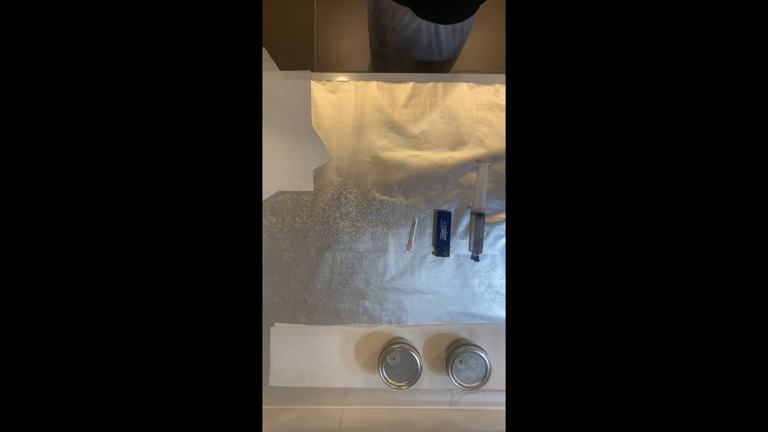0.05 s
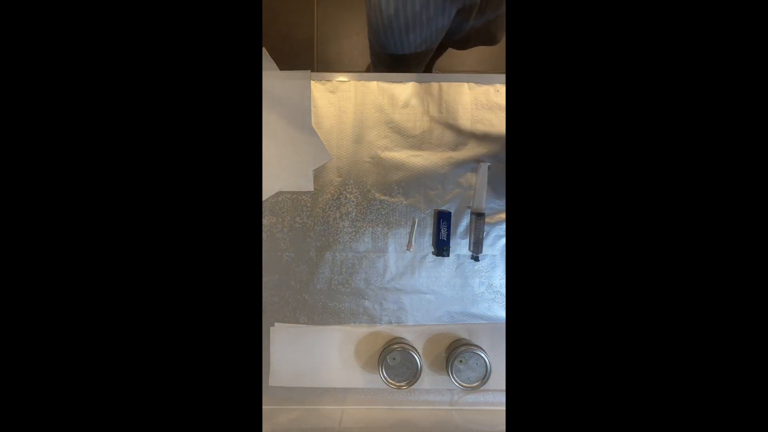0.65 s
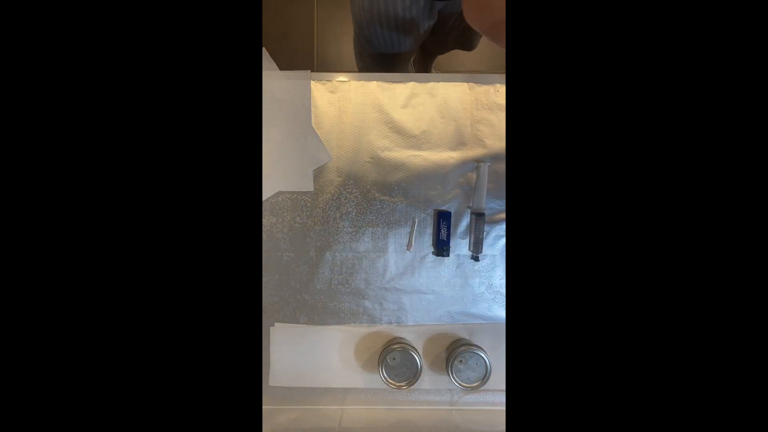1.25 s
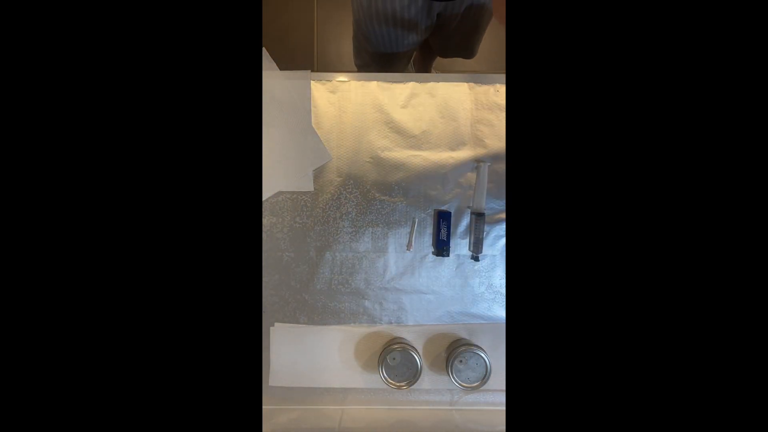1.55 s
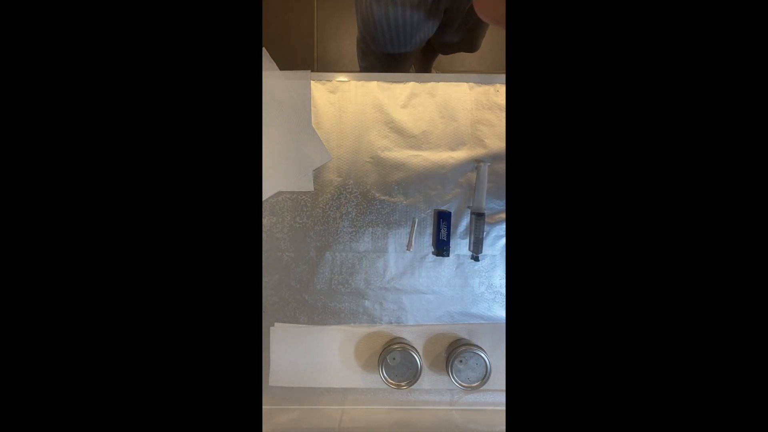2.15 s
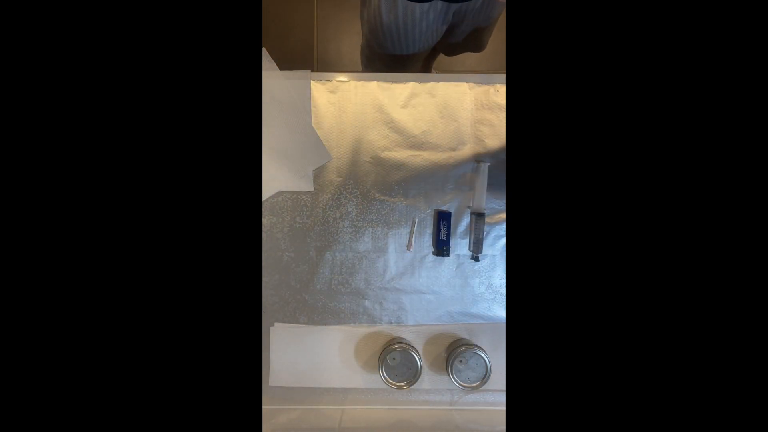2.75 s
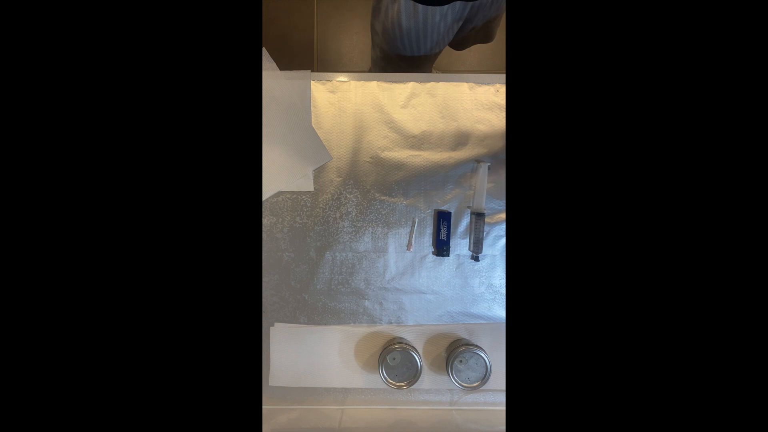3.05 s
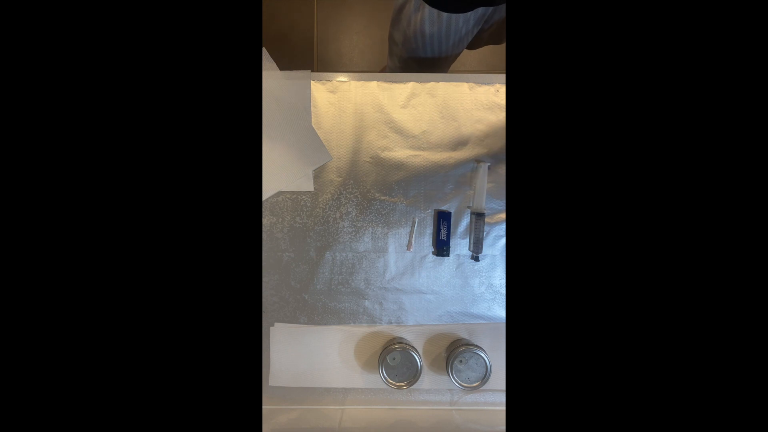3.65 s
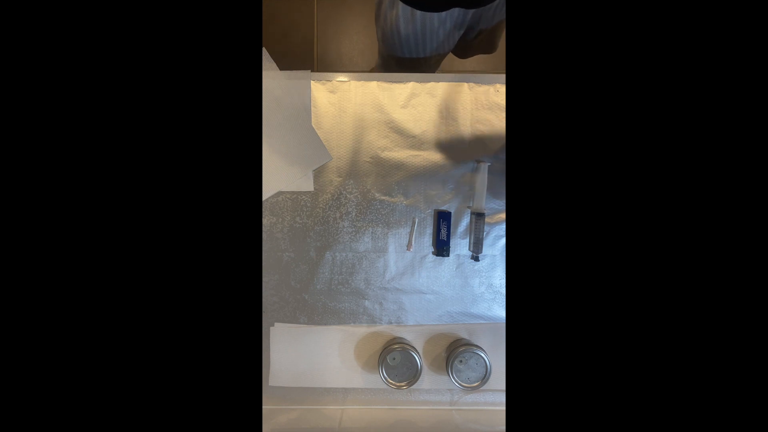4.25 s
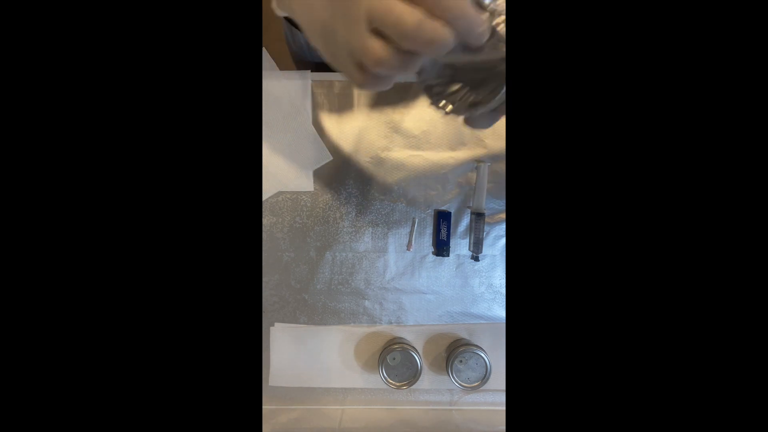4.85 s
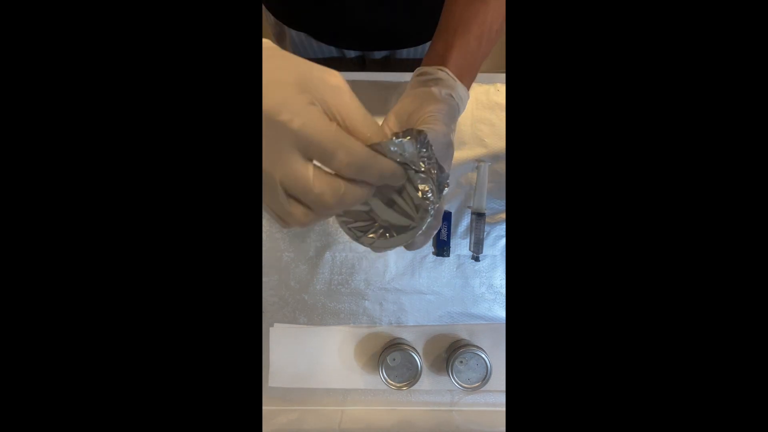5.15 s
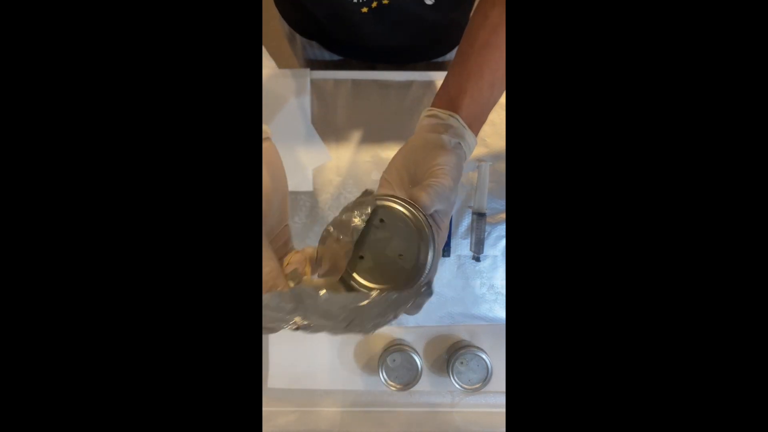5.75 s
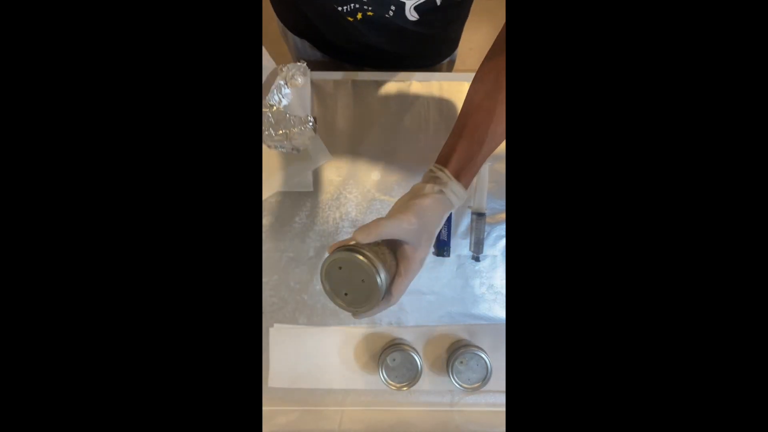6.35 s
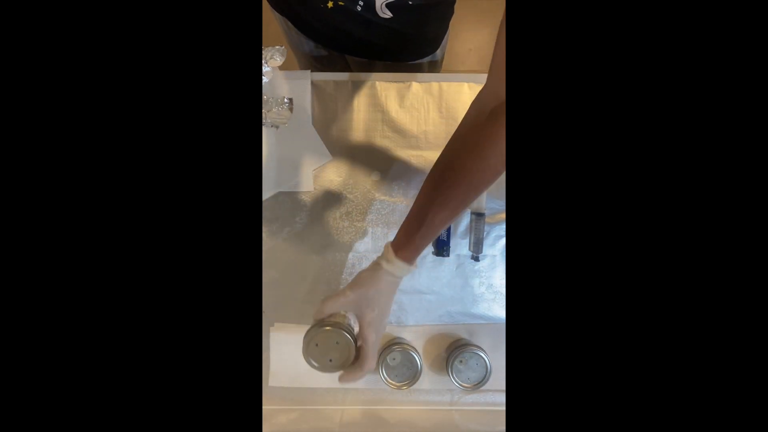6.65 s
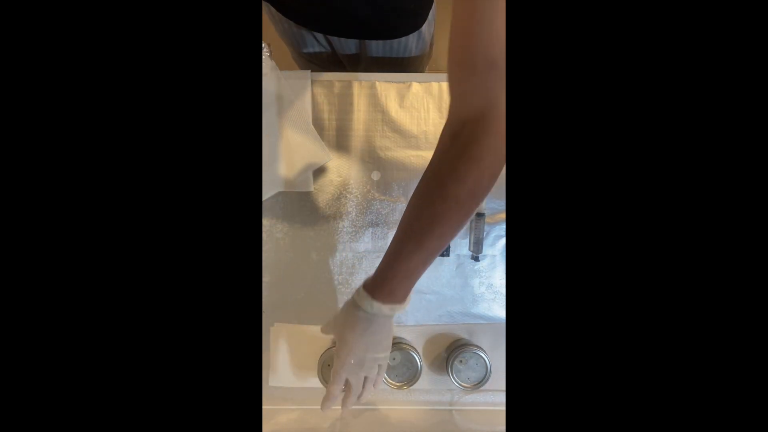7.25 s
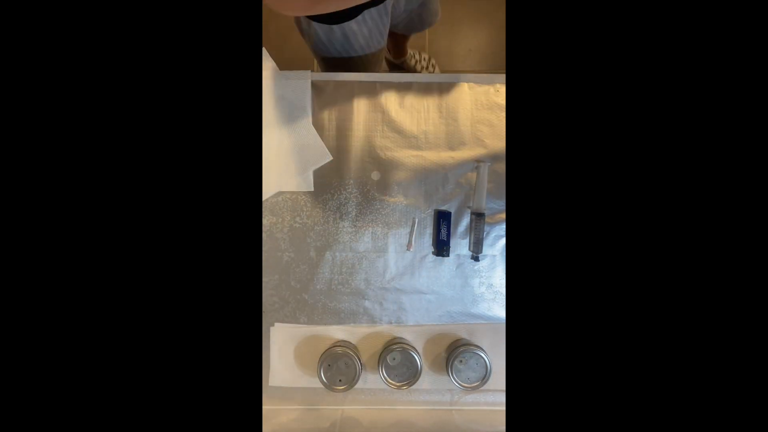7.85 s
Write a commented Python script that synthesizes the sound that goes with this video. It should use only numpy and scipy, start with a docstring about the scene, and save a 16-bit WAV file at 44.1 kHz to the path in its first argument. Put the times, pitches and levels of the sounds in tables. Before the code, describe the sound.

Close foil rustling builds to bright crackling in a small room; a jar knocks early on and is later set down softly.

```python
"""Aluminium foil crackles as it is picked loose and peeled off the metal lid of a glass jar, close by.
Creases snap singly and in avalanches, ringing facets of the sheet; large patches flip with a hollow pop.
Early on, further off, metal clinks and a jar knocks on a hard top. The bare jar is set down on a padded
table and the foil is gathered up. A small room adds echoes and a low ventilation rumble."""
import sys
import numpy as np
from scipy import signal
from scipy.fft import rfft, irfft, next_fast_len
from scipy.io import wavfile

SR = 44100
rng = np.random.default_rng(int(sys.argv[2]) if len(sys.argv) > 2 else 0)


def wrap_up_sound(samples):
    """Save the sound to the file named by the first command line argument, as 16-bit audio."""
    columns = np.atleast_2d(samples).T
    # keep every value between -1 and 1, then stretch to whole-number steps
    tamed = np.clip(columns, -1, 1)
    steps = np.round(tamed * 32767).astype(np.int16)
    wavfile.write(sys.argv[1], SR, steps)


N = 352491
T = np.arange(N) / SR

# Table levels are relative; each source sets its own gain.
# avalanches of creases (time [s], level [dB])
FOIL_CRUMPLES = [(0.0705, -27), (0.1587, -38.5), (0.2713, -40.5), (0.6755, -53.5), (0.6988, -40.5),
                 (0.934, -41.5), (0.9583, -31), (0.9794, -39), (1.6813, -36), (2.1636, -56),
                 (2.3548, -33.5), (2.3771, -31.5), (2.53, -23), (2.5626, -25.5), (2.616, -27.5),
                 (2.675, -31), (2.7056, -30), (2.744, -29.5), (2.7726, -36), (2.859, -36), (2.939, -34),
                 (3.0472, -30), (3.065, -32.5), (3.1015, -33), (3.211, -31), (3.266, -35.5),
                 (3.5294, -36.5), (3.553, -39), (3.669, -31.5), (3.79, -29.5), (3.8294, -24), (3.893, -17),
                 (4.0736, -49), (4.1928, -31), (4.2517, -46.5), (4.343, -29), (4.3644, -33),
                 (4.3793, -29.5), (4.4734, -20.5), (4.6165, -21.5), (4.6412, -14.5), (4.6773, -12.5),
                 (4.7284, -18), (4.806, -15.5), (4.8267, -18.5), (4.8404, -17), (4.995, -14),
                 (5.057, -21.5), (5.1966, -25), (5.242, -8.5), (5.2524, -12), (5.2624, -8.5),
                 (5.2674, -11.5), (5.3234, -25.5), (5.3787, -31.5), (5.4814, -19.5), (5.5, -19.5),
                 (5.5383, -21), (5.5608, -24), (5.5887, -17), (5.6655, -24.5), (5.686, -20.5), (5.7218, -9),
                 (5.7355, -11), (5.754, -14.5), (5.8, -24.5), (7.6056, -33.5), (7.6254, -21),
                 (7.6869, -21.5), (7.7783, -16), (7.8634, -20.5)]
# single creases (time [s], level [dB])
LONE_SNAPS = [(1.2124, -34), (1.3724, -42), (1.5693, -43), (1.6581, -33), (1.7958, -34), (1.9145, -35),
              (2.3575, -29), (2.4563, -31), (2.6475, -27), (2.706, -23), (2.828, -29), (2.9925, -32),
              (3.2091, -31), (3.4266, -35), (3.6037, -31), (3.767, -22), (4.2842, -32), (4.4370, -21),
              (4.6631, -17), (4.71, -16), (4.7285, -14), (4.8327, -15), (4.9691, -23), (5.024, -13),
              (5.1012, -12), (5.1297, -15), (5.2704, -8), (5.407, -17), (5.4707, -20), (5.4827, -10),
              (7.524, -47), (7.9463, -25)]
# large patches flipping (time [s], pitch [Hz], peak [dB])
PATCH_POPS = [(2.707, 1100, -42), (4.733, 650, -32), (5.058, 750, -32), (5.539, 1000, -32),
              (5.764, 600, -30), (6.61, 4300, -49)]
# finger moves on the foil (start [s], length [s], level [dB], hollow body re level [dB])
FINGER_MOVES = [(-.1, 0.46, -54.5, -5), (0.918, 0.68, -61, -5), (2.122, 0.23, -71.5, -12.5),
                (2.511, .21, -43.5, -11.5), (2.675, 0.71, -43.5, -19.5), (3.665, 0.42, -37, -20.5),
                (4.213, 0.36, -41, -22.5), (4.559, 0.19, -29.5, -20), (4.793, 0.044, -35.5, -7.5),
                (4.938, 0.54, -34, -16), (5.421, 0.19, -32, -10), (5.69, 0.101, -41, 5),
                (6.518, 0.16, -75, -6), (7.132, 0.6, -80, -3), (7.552, 0.11, -57, 4),
                (7.635, 0.14, -40, 1.5), (7.783, 0.17, -35, -13.5)]
# fine crease spectrum (frequency [Hz], level [dB])
CREASE_SPECTRUM = [(100, -27), (500, -23), (1200, -20), (2600, -13.5), (4300, -2.5), (6000, -.5), (8500, 0),
                   (12500, -4), (14000, -7.5), (16000, -11)]
# lone snap spectrum (frequency [Hz], level [dB])
TICK_SPECTRUM = [(300, -26), (2500, -24), (4500, -12), (7000, -3), (12500, 0), (16000, -4)]
# flexing sheet spectrum (frequency [Hz], level [dB])
SHEET_SPECTRUM = [(50, -7), (150, -3.5), (400, -8), (850, -7.5), (1100, -5.5), (1550, -0.5), (2150, 2),
                  (2900, 3), (4200, 5.5), (8000, -2)]
# jar chattering on a hard top (time [s], level [dB])
KNOCK_CONTACTS = [(0.964, -27.5), (1.03, 1), (1.0378, -5.5), (1.047, -12.5), (1.052, -3), (1.058, -7)]
# modes of jar and top (frequency [Hz], level [dB], t60 [s])
JAR_TOP_MODES = [(108, -23.5, .5), (155.6, -20, 0.43), (186.4, -19, 0.5), (216.5, -21, 0.69),
                 (330, -16.5, .2), (471.8, -14, 0.19), (600, -15.5, .1), (780, -14.5, 0.085),
                 (867, -13.5, .12), (1112, -15, .15), (1286, -14.5, .15), (1480, -4.5, .07),
                 (1470, -4, 0.2), (1744, -15, .15), (1990, -8.5, 0.13), (2100, -2, .13), (2037, 0.5, .07)]
# contact crack spectrum (frequency [Hz], level [dB])
CRACK_SPECTRUM = [(60, -9.5), (200, 0.5), (520, 0.5), (800, 1.5), (1050, -2), (1470, 6.5), (1750, -0.5),
                  (2100, 6.5), (2700, -6), (3300, -6.5), (4000, -13.5), (4850, -6), (6200, -11.5),
                  (12000, -33.5), (16000, -41.5)]
# blows on the padded table (time [s], level [dB])
TABLE_THUDS = [(7.099, 9), (7.109, 5.5), (7.648, -10), (7.668, -2), (7.897, -5.5)]
# table modes (frequency [Hz], level [dB], t60 [s])
PADDED_TABLE_MODES = [(78, -3.5, 0.27), (110.6, -4, 0.2), (133, 4.5, 0.093), (218.4, 0, 0.17),
                      (252, -1, 0.058)]
# light touches of jar and fingers (time [s], level [dB])
JAR_TOUCHES = [(.565, -2.5), (.725, 2.5), (6.748, 11), (6.805, -4), (7.307, 2.5), (7.42, -4.5)]
# held jar modes (frequency [Hz], level [dB], t60 [s])
HELD_JAR_MODES = [(820, 1, .09), (1276, -10, .07), (2105, -5, .07), (2186, -6, .07), (3106, -7, .04),
                  (3989, -7, .04)]
# bumps on something hollow (time [s], level [dB])
HOLLOW_BUMPS = [(7.738, -27.5), (7.757, -31), (7.781, -29.5)]
# its modes (frequency [Hz], level [dB], t60 [s])
BUMP_MODES = [(1938, -4, .07), (2099, -1, .08)]
# room reverberation (frequency [Hz], t60 [s])
REVERB_T60 = [(100, 1), (280, .55), (600, .75), (1500, .72), (4000, .58), (8000, .45), (15000, .3)]
# ventilation spectrum (frequency [Hz], level [dB])
RUMBLE_SPECTRUM = [(45, -3), (70, 2.5), (115, -1), (160, -4), (210, -27), (300, -12), (420, -20.5),
                   (800, -24.5), (1600, -38.5), (5000, -36), (16000, -56)]
# left-right likeness of room echo and rumble (frequency [Hz], correlation [0..1])
STEREO_LIKENESS = [(100, 1), (600, .14), (6000, .1), (9500, .9), (13000, .3)]
# pad, jar scuff and metal scrape spectra (frequency [Hz], level [dB])
PAD_SPECTRUM = [(50, -17), (120, 0.5), (250, 1.5), (450, -23.5), (1200, -25)]
SCUFF_SPECTRUM = [(300, -8.5), (800, -6.5), (1300, -3.5), (2150, -4.5), (4000, -4.5), (9000, -19)]
SCRAPE_SPECTRUM = [(1500, -17.5), (2700, -6), (3080, -5.5), (3400, 1), (3720, -5), (4300, -10),
                   (8000, -30)]

CRUMPLE_RISE_S, CRUMPLE_DECAY_S, DECAY_DOUBLING_DB = 0.0018, 0.0047, 36  # softer crumples last longer
GRIP_S, EASE_DB_PER_S, LET_GO_DB_PER_S = 0.047, 9.5, 243
SETTLE_DB, SETTLE_DB_PER_S = -17.5, 74.5
POP_Q, POP_DECAY_S = 5, 0.0097
RIGHT_LAG_S, BASS_CUT_HZ, TOP_CUT_HZ = 5.0e-5, 55, 15900


def crumples():
    """One crease sets off its neighbours in a fading avalanche; hard ones shake the whole sheet."""
    push, t = np.zeros(N), T[:SR // 8]
    for time_s, db in FOIL_CRUMPLES:
        start = int(time_s * SR)
        decay_s = CRUMPLE_DECAY_S * 2 ** (-db / DECAY_DOUBLING_DB)
        rise = 1 - np.exp(-t / CRUMPLE_RISE_S)
        push[start:start + len(t)] += undb(db + 2) * np.exp(-t / decay_s) * rise
    avalanche = scatter(creases(rate_hz=13000, spread_db=6) * push, decay_s=0.00063, tail_db=-6)
    flex = avalanche * push ** 0.58
    return undb(-8.5) * colour(avalanche, CREASE_SPECTRUM) + undb(0.5) * colour(flex, SHEET_SPECTRUM)


def rustle():
    """Moving foil fizzes with tiny creases; small facets ping, large patches ring hollow."""
    level, body = handling()
    fizz_snaps = crackles(rate_hz=2800, spread_db=5, spurt_db=3.8)
    fizz = level * scatter(fizz_snaps, decay_s=.001, tail_db=4)
    ping_snaps = crackles(rate_hz=260, spread_db=4, spurt_db=1.5)
    pings = level * facets(ping_snaps, low_hz=2400, high_hz=12000, cycles=5)
    patch_snaps = crackles(rate_hz=600, spread_db=3, spurt_db=2)
    patches = level * body * facets(patch_snaps, low_hz=420, high_hz=2600, cycles=3.5)
    bright = undb(-2.5) * colour(fizz, CREASE_SPECTRUM) + undb(-13.5) * pings
    hollow = undb(8.5) * colour(fizz * body, SHEET_SPECTRUM) + undb(-4.5) * patches
    return bright + hollow


def handling():
    """Rustle level and relative hollow body: each move grips, eases, lets go; the sheet settles."""
    t = T[::32]
    power, hollow_power = 1e-12, 1e-14
    for start_s, length_s, db, body_db in FINGER_MOVES:
        held_s = np.clip(t - start_s, 0, length_s)
        after_s = np.maximum(t - start_s - length_s, 0)
        grip = np.clip((t - start_s) / GRIP_S, 0, 1)
        release_db = np.maximum(-LET_GO_DB_PER_S * after_s, SETTLE_DB - SETTLE_DB_PER_S * after_s)
        move = grip * undb(db - EASE_DB_PER_S * held_s + release_db)
        power += move ** 2
        hollow_power += (move * undb(body_db)) ** 2
    return np.interp(T, t, np.sqrt(power)), np.interp(T, t, np.sqrt(hollow_power / power))


def lone_snaps():
    """Single creases snap with a bright tick; hard ones also shake the sheet."""
    ticks = scatter(blows(LONE_SNAPS), decay_s=.0025, tail_db=4)
    shakes = blows([(time_s, 1.5 * db) for time_s, db in LONE_SNAPS])
    flex = scatter(shakes, decay_s=.003, tail_db=6)
    return undb(15) * colour(ticks, TICK_SPECTRUM) + undb(14) * colour(flex, SHEET_SPECTRUM)


def pops():
    """A large patch of foil flips and rings briefly at its own pitch."""
    out = np.zeros(N)
    for time_s, hz, db in PATCH_POPS:
        flip = signal.lfilter(*signal.iirpeak(hz, POP_Q, fs=SR), burst(POP_DECAY_S))[:SR // 10]
        start = int(time_s * SR)
        out[start:start + len(flip)] += undb(db) * flip / np.abs(flip).max()
    return out


def creases(rate_hz, spread_db):
    """Random snaps of either sign, many small, a few large; rms 1."""
    happens = rng.random(N) < rate_hz / SR
    size = undb(spread_db * np.minimum(rng.standard_normal(N), 2.3))
    return unit(happens * size * rng.choice([-1, 1], N))


def crackles(rate_hz, spread_db, spurt_db):
    """Snaps in uneven spurts; rms 1."""
    return unit(creases(rate_hz, spread_db) * undb(spurt_db * walk(rate_hz=60)))


def facets(snaps, low_hz, high_hz, cycles, count=16):
    """Each snap rings one facet of the sheet for a few cycles; large facets ring low."""
    facet, out = rng.integers(0, count, N), 0
    for k, hz in enumerate(np.geomspace(low_hz, high_hz, count)):
        radius = np.exp(-hz / cycles / SR)
        poles = [1, -2 * radius * np.cos(2 * np.pi * hz / SR), radius ** 2]
        drive = snaps * ((facet == k) + 1e-9) + 1e-18 * T  # offsets avoid denormals
        mode = signal.lfilter([1, 0, -1], poles, drive)
        out = out + mode * np.sqrt((1 - radius ** 2) / 2)
    return out


def scatter(snaps, decay_s, tail_db):
    """Each click runs on as a short noisy tail, as through the wrinkles of foil."""
    pole = np.exp(-2 / (decay_s * SR))
    energy = signal.lfilter([1 - pole], [1, -pole], snaps ** 2 + 1e-18)
    tail = undb(tail_db) * np.sqrt(energy) * rng.standard_normal(N)
    return (snaps + tail) / np.hypot(1, undb(tail_db))


def buckle(x, depth_db, rate_hz, count=16):
    """The sheet keeps changing shape; its resonances swell and vanish independently."""
    out = x
    for hz in np.geomspace(700, 13000, count):
        band = signal.lfilter(*signal.iirpeak(hz, Q=8, fs=SR), x)
        out = out + band * (undb(depth_db * walk(rate_hz)) - 1)
    return out


def jar_knock():
    """Glass meets a hard top: a crack at each contact, then the modes ring on."""
    contacts = blows(KNOCK_CONTACTS)
    crack = colour(convolve(contacts, burst(decay_s=0.0065))[0], CRACK_SPECTRUM)
    return undb(-23) * ring(contacts, JAR_TOP_MODES) + undb(7) * crack


def table_thuds():
    """Padded blows push slowly and ring only low modes."""
    push = np.hanning(60)
    thuds = convolve(blows(TABLE_THUDS), push / push.sum())[0]
    pad = colour(convolve(thuds, burst(decay_s=0.013))[0], PAD_SPECTRUM)
    return undb(-39) * ring(thuds, PADDED_TABLE_MODES) + undb(-13) * pad


def jar_touches():
    """Light touches scuff the jar and ring it dully, damped by the hand."""
    touches = blows(JAR_TOUCHES)
    scuffs = colour(scatter(touches, decay_s=0.026, tail_db=19.5), SCUFF_SPECTRUM)
    return undb(-62) * ring(touches, HELD_JAR_MODES) + undb(-35) * scuffs


def hollow_bumps():
    """Something hollow is bumped and rings as the foil is gathered up."""
    return ring(blows(HOLLOW_BUMPS), BUMP_MODES)


def metal_clink():
    """A light scrape on metal rings briefly."""
    scrape = scatter(blows([(.72, 0.0011)]), decay_s=0.024, tail_db=-0.5)
    return undb(-21) * colour(scrape, SCRAPE_SPECTRUM)


def room_echoes(x, early_db, early_s, late_db):
    """Table top and near walls return quick echoes; the room rings on, treble dying first."""
    hz, t, bins = signal.stft(diffuse(SR), SR, nperseg=256)
    early = undb(early_db) * np.exp(-t / early_s)
    late = undb(late_db - 60 * t / along(REVERB_T60, hz)[:, None])
    tail = signal.istft(bins * (early + late), SR, nperseg=256)[1]
    onset = np.clip((T[:tail.shape[1]] - .001) / .002, 0, 1)
    return convolve(x, tail * onset)


def ventilation():
    """Low rumble with a wavering hum."""
    rumble = np.array([colour(channel, RUMBLE_SPECTRUM) for channel in diffuse(N)])
    hum_hz = 116 + 3 * walk(rate_hz=1.4)
    hum = np.sin(2 * np.pi * np.cumsum(hum_hz) / SR) * undb(0.96 * walk(rate_hz=8))
    return undb(-59.5) * rumble + undb(-63.5) * hum


def diffuse(length):
    """Stereo noise for room echo and rumble; left-right likeness varies with frequency."""
    size = next_fast_len(length)
    likeness = np.clip(along(STEREO_LIKENESS, np.fft.rfftfreq(size, 1 / SR)), 0, .995)
    mid, side = rfft(rng.standard_normal((2, size)))
    mid *= np.sqrt((1 + likeness) / 2)
    side *= np.sqrt((1 - likeness) / 2)
    return irfft([mid + side, mid - side], size)[:, :length]


def right_lag(pair):
    """Sound arrives on the left just before the right."""
    size = next_fast_len(N + 64)
    lag = np.exp(-2j * np.pi * np.fft.rfftfreq(size, 1 / SR) * RIGHT_LAG_S)
    right = irfft(rfft(pair[1], size) * lag, size)[:N]
    return np.array([pair[0], right])


def blows(rows):
    """One impulse per (time [s], level [dB]) row."""
    x = np.zeros(N)
    for time_s, db in rows:
        x[int(time_s * SR)] += undb(db)
    return x


def burst(decay_s):
    """Decaying noise of unit energy."""
    t = T[:SR // 4]
    x = rng.standard_normal(len(t)) * np.exp(-t / decay_s)
    return x / np.linalg.norm(x)


def ring(x, modes):
    """Drive damped (frequency [Hz], level [dB], t60 [s]) modes."""
    t = T[:SR]
    response = sum(undb(db - 60 * t / t60_s) * np.sin(2 * np.pi * hz * t) for hz, db, t60_s in modes)
    return convolve(x, response)[0]


def colour(x, points, size=4096):
    """Minimum-phase filter of unit energy through (frequency [Hz], level [dB]) points."""
    gain = undb(along(points, np.fft.rfftfreq(size, 1 / SR)))
    cepstrum = irfft(np.log(gain))
    cepstrum[1:size // 2] *= 2
    cepstrum[size // 2 + 1:] = 0
    response = irfft(np.exp(rfft(cepstrum)))
    return convolve(x, response / np.linalg.norm(response))[0]


def convolve(x, response):
    """Apply an impulse response per channel."""
    return signal.oaconvolve(np.atleast_2d(x), np.atleast_2d(response), axes=1)[:, :N]


def along(points, hz):
    """Interpolate (frequency [Hz], value) points on a log-frequency axis."""
    point_hz, value = np.transpose(points)
    return np.interp(np.log(hz + 1), np.log(point_hz), value)


def walk(rate_hz):
    """Random drift, spread near 1."""
    knots = rng.standard_normal(N // 40)
    return np.interp(T * rate_hz, np.arange(len(knots)), knots)


def undb(db):
    """Decibels to gain."""
    return 10 ** (np.asarray(db) / 20)


def unit(x):
    """Scale to rms 1."""
    return x / np.sqrt(np.mean(x ** 2))


def scene():
    """Foil, jar and table are close; knock and clink are further off and more reverberant."""
    foil = buckle(undb(-3) * rustle() + crumples(), depth_db=4.2, rate_hz=40)
    near = foil + lone_snaps() + pops() + table_thuds() + jar_touches() + hollow_bumps()
    far = jar_knock() + metal_clink()
    near_echoes = room_echoes(near, early_db=-27.5, early_s=.005, late_db=-42.5)
    far_echoes = room_echoes(far, early_db=-40, early_s=0.027, late_db=-38.5)
    return right_lag(near + far + near_echoes + far_echoes + ventilation())


def record(dry):
    """The loudest peaks are softly rounded; deep bass and top are cut."""
    bass_cut = signal.butter(3, BASS_CUT_HZ, "highpass", fs=SR, output="sos")
    top_cut = signal.ellip(10, .2, 90, TOP_CUT_HZ, fs=SR, output="sos")
    return signal.sosfilt(np.vstack([bass_cut, top_cut]), np.tanh(dry))


dry = scene()
out = record(dry)
wrap_up_sound(out)
```